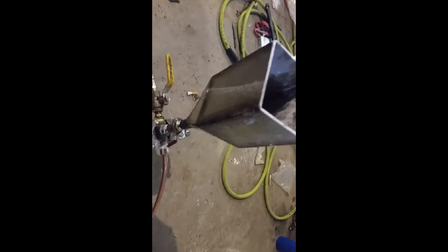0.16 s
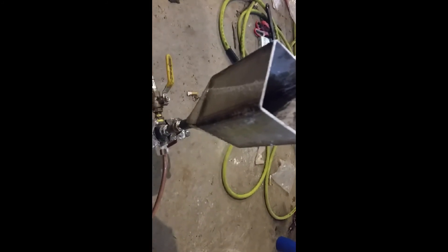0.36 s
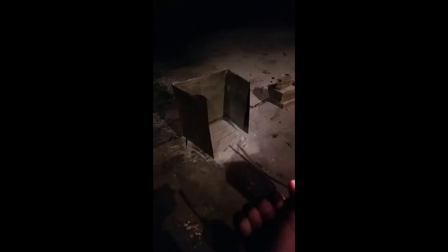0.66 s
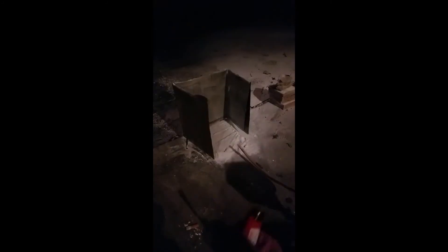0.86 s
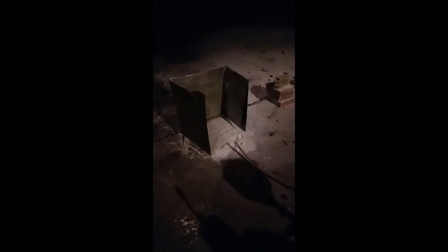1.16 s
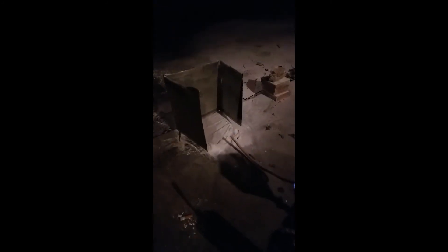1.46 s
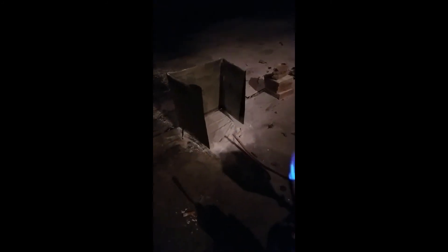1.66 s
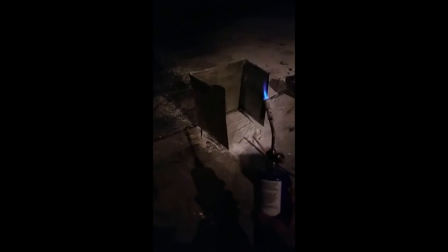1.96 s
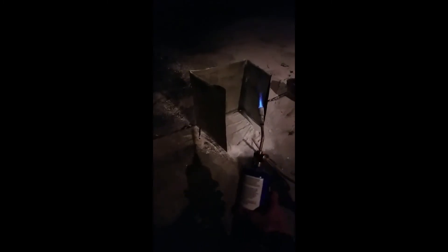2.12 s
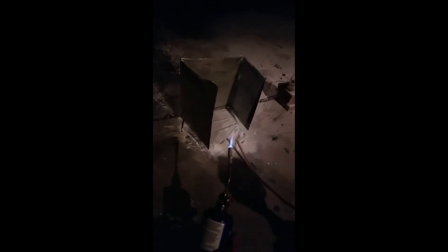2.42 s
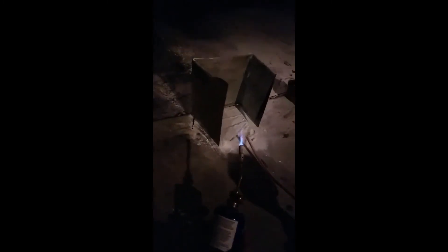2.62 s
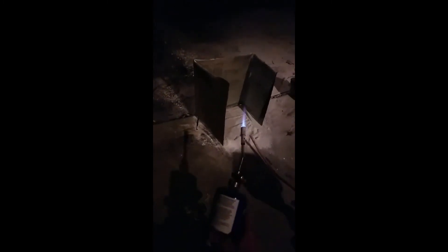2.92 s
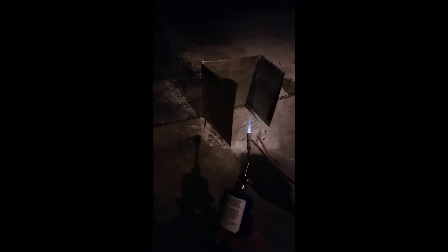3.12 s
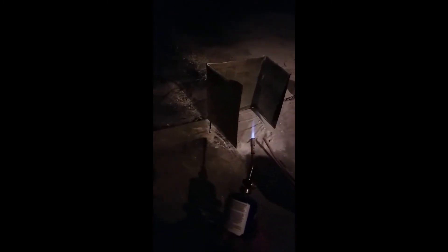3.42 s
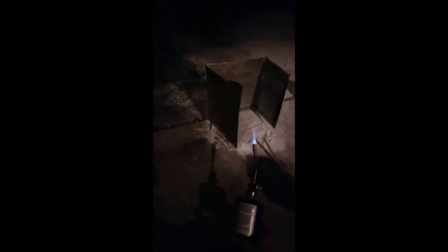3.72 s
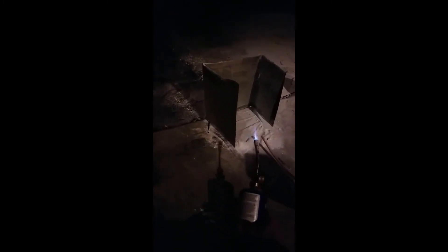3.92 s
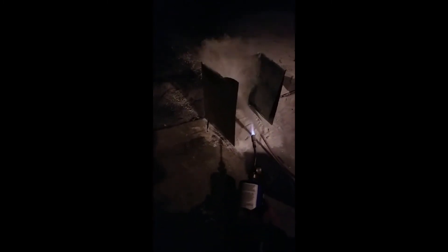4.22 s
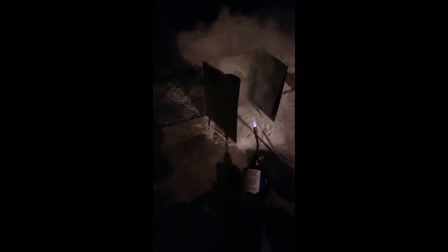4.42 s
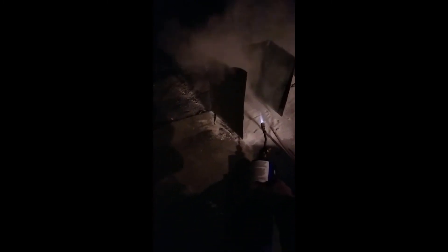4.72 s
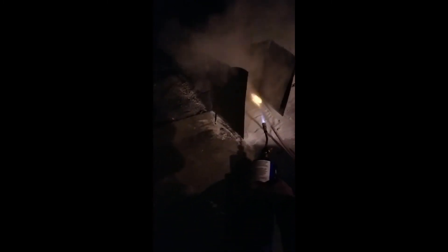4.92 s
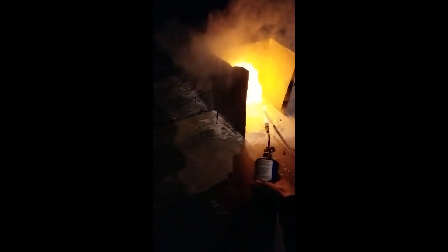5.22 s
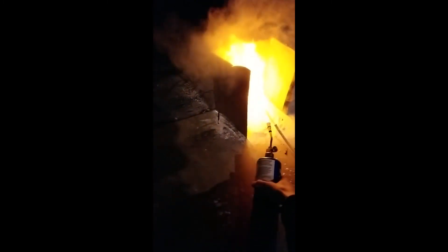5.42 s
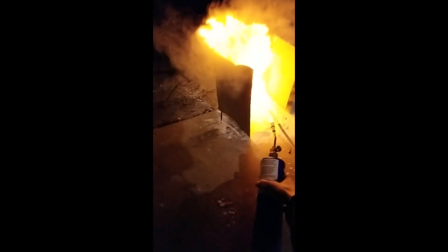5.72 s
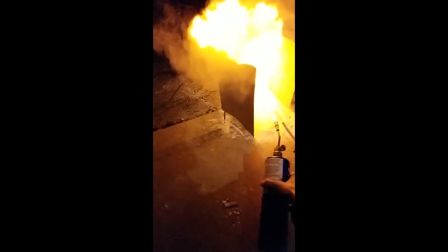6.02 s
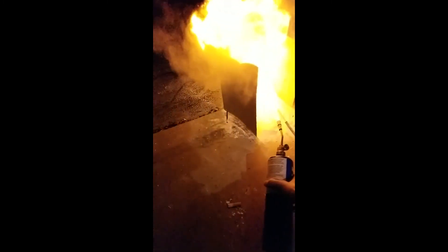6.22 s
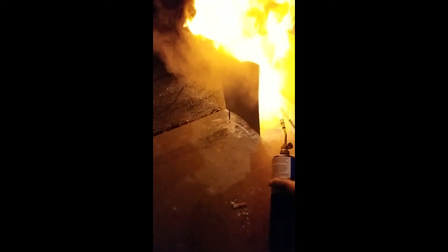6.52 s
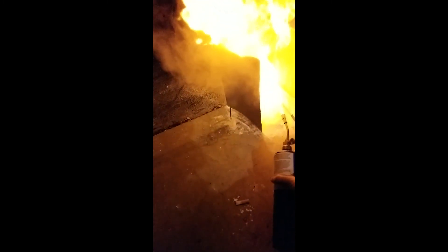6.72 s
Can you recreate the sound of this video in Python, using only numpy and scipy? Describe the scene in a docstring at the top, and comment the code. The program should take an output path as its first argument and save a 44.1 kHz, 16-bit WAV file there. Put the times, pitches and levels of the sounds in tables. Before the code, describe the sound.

A brief plastic knock over faint room hum gives way to an outdoor scene with a bright hiss of compressed air. Close to the microphone, a gas torch lights with a low pop, its fittings click, and it roars with a low flutter. A hollow note climbs through the noise until powder ignites. The sound suddenly turns slowed and muffled, and a fireball billows up in deep surges.

```python
"""Torch and powder fireball

A quiet workshop and a knock on plastic; then, outdoors, compressed air hisses beside a roaring torch.
The ground reflects both jets, and the echo sweeps upward as the torch is lowered to powdered fuel.
The powder catches and the scene drops into slow motion: a dull hiss under a fireball's growing rumble."""
import sys
import numpy as np
from scipy import signal
from scipy.fft import rfft, irfft, next_fast_len
from scipy.io import wavfile
from scipy.ndimage import uniform_filter1d

SR = 44100
rng = np.random.default_rng(int(sys.argv[2]) if len(sys.argv) > 2 else 0)


def waveform_to_disk(signal):
    """Save audio, clipped to [-1, 1], as 16-bit WAV at the path in sys.argv[1]."""
    frames = np.transpose(np.atleast_2d(signal))
    scaled = np.clip(frames, -1, 1) * 32767
    samples = np.round(scaled).astype(np.int16)
    wavfile.write(sys.argv[1], SR, samples)


N = 302746
TIME = np.arange(N) / SR
BINS_HZ = np.fft.rfftfreq(1024, 1 / SR)
FRAMES_S = np.arange(N // 256 + 5) * 256 / SR


def amp(db):
    """Decibels to gain."""
    return 10 ** (np.asarray(db) / 20)


def rms(x):
    """Root mean square."""
    return np.sqrt(np.mean(x ** 2) + 1e-20)


def follow(rows, at=TIME):
    """A curve of (seconds, value) rows at the given times."""
    return np.interp(at, *np.transpose(rows))


def step(middle_s, width_s, at=TIME):
    """Smooth rise from 0 to 1."""
    return .5 + .5 * np.tanh((at - middle_s) / (2 * width_s))


def gate(start_s, end_s, fade_in_s, fade_out_s):
    """Gain 1 from start to end, with smooth edges."""
    return .5 + .5 * np.tanh(np.minimum((TIME - start_s) / fade_in_s, (end_s - TIME) / fade_out_s))


def add(mix, start_s, sound):
    """Adds a mono or stereo sound to a stereo mix."""
    part = mix[:, round(start_s * SR):][:, :sound.shape[-1]]
    part += sound[..., :part.shape[1]]


def lowpass(x, hz, taps=601):
    """Steep low-pass of both channels."""
    kernel = signal.firwin(taps, hz, window=("kaiser", 8), fs=SR)
    return signal.oaconvolve(x, kernel[None], "same")


def spectrum_at(rows, at_hz):
    """Each column of a spectrum, interpolated over log frequency."""
    hz, *columns = np.transpose(rows)
    return [np.interp(np.log(at_hz + 1), np.log(hz), column) for column in columns]


def turbulence(spectrum, patchy_db, colour_db=0, lag_ms=0):
    """Stereo noise, mid rms 1, with eddies that lift patches of its spectrum."""
    left_db, right_db, likeness = spectrum_at(spectrum, BINS_HZ)
    re, im, other_re, other_im, eddies = rng.standard_normal((5, len(FRAMES_S), len(BINS_HZ)))
    eddies = uniform_filter1d(uniform_filter1d(eddies, 12, axis=0), 6, axis=1)
    left = re + 1j * im
    right = likeness * left + np.sqrt(1 - likeness ** 2) * (other_re + 1j * other_im)
    right *= np.exp(-2j * np.pi * BINS_HZ * lag_ms / 1000)
    spectra = np.array([left * amp(left_db), right * amp(right_db)])
    spectra *= amp(patchy_db * eddies / rms(eddies) + colour_db)
    noise = signal.istft(spectra, nperseg=1024, noverlap=768, time_axis=1, freq_axis=2)[1][:, :N]
    return noise / rms(noise.mean(0))


def rumble(spectrum, steady_s):
    """Deep stereo noise, mid rms near 1, its swells evened out over steady_s."""
    size = next_fast_len(N, True)
    hz = np.fft.rfftfreq(size, 1 / SR)
    db, likeness = spectrum_at(spectrum, hz)
    left, other = rfft(rng.standard_normal((2, size)))
    right = likeness * left + np.sqrt(1 - likeness ** 2) * other
    low_hz, high_hz = spectrum[0][0], spectrum[-1][0]
    rolloff = np.minimum(hz / low_hz, 1) ** 2 / (1 + (hz / high_hz) ** 4)
    noise = irfft(np.array([left, right]) * amp(db) * rolloff, size)[:, :N]
    power = uniform_filter1d(noise.mean(0) ** 2, int(steady_s * SR) + 1)
    return noise / np.sqrt(power + 1e-12)


def strikes(blows, modes, crack_gain, crack_t60_s, contact_s=0.0001):
    """Each blow is a crack of noise and the short ring of the struck object."""
    out, t = np.zeros((2, N)), np.arange(SR // 8) / SR
    for start_s, peak_db, lean_db, hardness_db in blows:
        ring = np.zeros((2, len(t)))
        for hz, db, t60_s in modes:
            envelope = amp(db + hardness_db * np.log2(hz / modes[0][0]) - 60 * t / t60_s)
            phase = rng.random() + rng.random((2, 1)) / 4
            ring += envelope * np.sin(2 * np.pi * (hz * t + phase))
        crack = crack_gain * rng.standard_normal((2, len(t))) * amp(-60 * t / crack_t60_s)
        hit = (ring / abs(ring).max() + crack) * (1 - np.exp(-t / contact_s))
        pan = amp(np.array([[.5], [-.5]]) * lean_db)
        add(out, start_s, amp(peak_db) * pan * hit / abs(hit).max())
    return out


# Room and rustle spectra. Each row: frequency in Hz, left and right in relative dB, stereo correlation.
ROOM_SPECTRUM = [(25, -10, -18, 0.72), (88, -1, 2, 0.94), (221, -13, -11.5, 0.9), (450, -22, -21.5, 0.1),
                 (1500, -29, -27.5, 0.049), (4500, -30, -30, -0.0), (9000, -33, -36, 0.077),
                 (14000, -31, -30, -0.1)]
RUSTLE_SPECTRUM = [(300, 4, 6.5, .3), (1200, -8, -8, 0.024), (2400, -3, -3, 0), (4200, -3, 1.5, 0),
                   (7000, -5.5, -11, 0), (14000, -14, -17, 0)]
# Hum. Each row: frequency in Hz, relative level in dB.
HUM_TONES = [(91.5, -67.5), (166.9, -90), (253.0, -74)]


def workshop(room_db=-63.5, hum_trim_db=-2, rustle_db=-61, hold_s=.09, fade_db_per_s=96, rest_db=-85):
    """Low room noise, a faint hum and a rustle that dies away."""
    hum = sum(np.sqrt(2) * amp(db + hum_trim_db) * np.sin(2 * np.pi * (hz * TIME + rng.random()))
              for hz, db in HUM_TONES)
    room = amp(room_db) * turbulence(ROOM_SPECTRUM, patchy_db=1.6)
    fading_db = np.maximum(rustle_db - fade_db_per_s * np.maximum(TIME - hold_s, 0), rest_db)
    return room + hum + amp(fading_db) * turbulence(RUSTLE_SPECTRUM, patchy_db=3.5)


# Each row: start in seconds, level in dB before the soft onset, pitch in Hz, T60 in seconds.
THUMP_EVENTS = [(.067, -27, 104, 0.055), (0.094, -27.5, 308, 0.023), (1.181, -13, 108, 0.039),
                (5.376, -39.5, 1110, 0.073)]


def thumps(rise_cycles=0.8):
    """Damped sines: two thumps in the workshop, one as the flame takes hold, a ping in slow motion."""
    out, t = np.zeros((2, N)), np.arange(SR // 8) / SR
    for start_s, db, hz, t60_s in THUMP_EVENTS:
        onset = 1 - np.exp(-(hz * t / rise_cycles) ** 2)
        add(out, start_s, onset * amp(db - 60 * t / t60_s) * np.sin(2 * np.pi * hz * t))
    return out


# Each row: start in seconds, peak in dB before panning, left minus right in dB, hardness in dB/octave.
PLASTIC_BLOWS = [(.0678, -42, 12, -4.5), (.0924, -18.6, -6, -0.2)]
# Each row: frequency in Hz, relative level in dB, T60 in seconds.
PLASTIC_MODES = [(530, -3.5, 0.0064), (784, -7.5, 0.0087), (1400, -6.5, 0.0052), (2100, -4.5, 0.0033),
                 (3270, -9, .005), (4470, -12, 0.0045), (5640, -2.5, 0.0056), (6540, -13, .005),
                 (8450, -15, 0.0056), (11400, -15, 0.0044), (14200, -14, .004)]


def plastic_knocks():
    """Hard plastic, touched and then knocked, rings for a few milliseconds."""
    return strikes(PLASTIC_BLOWS, PLASTIC_MODES, crack_gain=.06, crack_t60_s=0.0071)


LOWERED_S, LOWERING_S = 2.92, .08
# Ground echo, shorter as the torch is lowered. Each row: time in seconds, delay in ms.
ECHO_DELAY = [(1.7, 2.5), (2.5, 2.4), (2.8, 1.7), (3.1, 1.36), (3.65, 1.45), (4.2, 1.164), (4.85, .88),
              (5.27, 0.65)]


def ground_echo(at, raised=.1, lowered=0.37):
    """Delay in seconds and strength of the reflection, faint until the flame points at the ground."""
    return follow(ECHO_DELAY, at) / 1000, raised + (lowered - raised) * step(LOWERED_S, LOWERING_S, at)


def ground_comb(right_detour=0.895, dull_hz=5600, hollow_db=10, hollow_octaves=0.32):
    """Echo ripple in dB; rough ground scatters the treble, and the right side has the shorter detour."""
    delay_s, strength = ground_echo(FRAMES_S[:, None])
    delay_s = np.array([delay_s, delay_s * right_detour])
    echo = strength / (1 + (BINS_HZ / dull_hz) ** 4) * np.exp(-2j * np.pi * BINS_HZ * delay_s)
    # Repeated bounces sharpen the first peak into a hollow, rising note.
    hollow = np.exp(-(np.log2((BINS_HZ + 1) * delay_s) / hollow_octaves) ** 2)
    return 20 * np.log10(abs(1 + echo)) + hollow_db * strength * hollow


def with_bass_echo(direct, bass_boost=1.6):
    """Adds the ground echo to a deep sound; bass reflects better than treble."""
    delay_s, strength = ground_echo(TIME)
    echo = np.array([np.interp(TIME - delay_s, TIME, side) for side in direct])
    gain = bass_boost * strength
    return (direct + gain * echo) / (1 + gain)


# Each row: frequency in Hz, left and right in relative dB, stereo correlation.
AIR_SPECTRUM = [(800, -39.5, -39.5, .5), (1500, -18, -20.5, 0.32), (2600, -16, -17.5, 0.2),
                (3990, -7, -10.5, 0.17), (4760, -6, -8, .2), (6200, -3.5, -5, 0.18), (7900, -4, -7, 0.1),
                (8900, -7.5, -10.5, 0.295), (9680, -2.5, -11.5, 0.27), (10550, 2.5, -5, 0.25),
                (11400, 0, -5.5, 0.28), (12600, -3, -5.5, 0.23), (13800, 1.5, -2, .3),
                (14580, -1.5, -9.5, .3)]
# Shading of the right side as the microphone turns. Each row: time in seconds, relative shade in dB.
AIR_RIGHT_SHADE = [(1.4, 1.5), (2.4, 2), (2.88, 8.5), (3.07, 4.5), (4.35, 4), (5.25, 10)]
# Each row: time in seconds, lag of the right side in ms.
AIR_RIGHT_LAG = [(.8, 0.084), (2.4, 0.083), (3.1, 0.17), (5.2, .16)]


def air_jet(comb_db, open_db=-36, open_s=1.436, opening_db_per_s=16, sizzle_hz=11000):
    """Air hisses from the feed line as its valve opens, sizzling more once the microphone points down."""
    valve_db = open_db - opening_db_per_s * np.maximum(open_s - TIME, 0)
    dip_db = -np.exp(-((TIME - 2.36) / 0.2) ** 2)
    shade_db = np.array([[0.097], [-0.903]]) * (follow(AIR_RIGHT_SHADE) - 5)
    sizzle_band = np.exp(-((BINS_HZ - sizzle_hz) / 1300) ** 2)
    sizzle_db = (-1.7 + 2 * step(LOWERED_S, LOWERING_S, FRAMES_S[:, None])) * sizzle_band
    lag_ms = follow(AIR_RIGHT_LAG, FRAMES_S[:, None])
    hiss = turbulence(AIR_SPECTRUM, patchy_db=1.5, colour_db=comb_db + sizzle_db, lag_ms=lag_ms)
    return amp(valve_db + dip_db + shade_db) * hiss


LIT_S = 1.178
# Each row: end of rise and start of fall in seconds, flutter and roar levels in dB.
GAS_FLARES = [(.89, 0.998, -40.5, -45), (1.117, 1.16, -37.5, -43), (1.189, 1.185, -35, -37.5)]


def ignition(near_db, lit_roar_db=-39, lit_flutter_db=-46.5, rise_db_per_s=325, fall_db_per_s=400):
    """Roar and flutter gains: gas flares softly twice, then pops as the flame settles on the nozzle."""
    lit = step(LIT_S, width_s=0.002)
    roar, flutter = lit * amp(lit_roar_db + near_db), lit * amp(lit_flutter_db)
    for risen_s, fall_s, flutter_db, roar_db in GAS_FLARES:
        rise_db = -rise_db_per_s * np.maximum(risen_s - TIME, 0)
        fall_db = -fall_db_per_s * np.maximum(TIME - fall_s, 0)
        roar = np.hypot(roar, amp(roar_db + rise_db + fall_db))
        flutter = np.hypot(flutter, amp(flutter_db + rise_db + fall_db))
    return roar, flutter


# Torch held close, then lowered. Each row: time in seconds, gain from nearness in dB.
TORCH_NEARNESS = [(1.2, 3.5), (1.4, 4), (2.25, 3), (2.6, -1), (2.9, -2), (3.05, 1.5), (3.7, 0), (4.25, 1),
                  (4.55, -.5), (5.25, -0.6)]
# Each row: frequency in Hz, relative level in dB, stereo correlation.
FLUTTER_SPECTRUM = [(20, -16.5, .8), (40.16, -13.5, .85), (69.4, -3.5, .9), (116, 1, 0.91),
                    (161, -4.5, 0.82), (225, 0, .8), (420, -9, 0.73), (1000, -35.5, .8)]
# Each row: frequency in Hz, left and right in relative dB, stereo correlation.
ROAR_SPECTRUM = [(80.7, -19, -23, 1), (237.2, -3, -1, 0.36), (420, 0.5, -2.5, .7), (670, 0, -3.5, 0.64),
                 (923, 0.5, -1, 0.69), (1210, 0.5, -1.5, 0.49), (1828, -3.5, -7.5, 0.29),
                 (2480, -4.5, -8, 0.33), (3777, -10.5, -12, .1), (6400, -20, -25.5, .2)]


def torch(comb_db, flicker_db=0.5, idle_db=-66):
    """The flame roars, brighter when near; each low flutter shakes the roar a little."""
    roar_gain, flutter_gain = ignition(follow(TORCH_NEARNESS))
    near_db = follow(TORCH_NEARNESS, FRAMES_S)
    tilt_db_per_octave = np.where(FRAMES_S < LIT_S, 0.4, 0.76 + 0.19 * near_db)
    octaves = np.log2(np.clip(BINS_HZ, 250, 4000) / 1000)
    colour_db = comb_db + tilt_db_per_octave[:, None] * octaves
    # Echo and tilt colour the roar but keep its midrange power.
    midrange = (BINS_HZ > 450) & (BINS_HZ < 1800)
    power = np.mean(amp(colour_db[:, :, midrange]) ** 2, axis=(0, 2))
    colour_db -= 10 * np.log10(power)[:, None]
    flutter = with_bass_echo(rumble(FLUTTER_SPECTRUM, steady_s=0.13))
    roar = turbulence(ROAR_SPECTRUM, patchy_db=1.71, colour_db=colour_db)
    flicker = amp(flicker_db * flutter.mean(0))
    return roar_gain * flicker * roar + np.hypot(flutter_gain, amp(idle_db)) * flutter


# Each row: start in seconds, peak in dB before panning, left minus right in dB, hardness in dB/octave.
FITTING_BLOWS = [(1.4458, -7, 9, 0.5), (1.4566, -22.5, 3.5, 1.5)]
# Each row: frequency in Hz, relative level in dB, T60 in seconds.
FITTING_MODES = [(2250, -10.5, .014), (2680, -10.5, .014), (3450, -10, 0.0086), (4880, -7.5, 0.0092),
                 (6370, -3, 0.0061), (6950, -5.5, 0.00607), (8240, -9.5, 0.0069), (9700, -15, 0.0074),
                 (11750, -10.5, .006), (13400, -12.5, 0.0082)]


def torch_clicks():
    """A sharp click rings the torch's metal fittings; a weaker echo of it follows 11 ms later."""
    return strikes(FITTING_BLOWS, FITTING_MODES, crack_gain=.1, crack_t60_s=0.01)


# Each row: frequency in Hz, relative level in dB, stereo correlation.
WHOOSH_SPECTRUM = [(90, -13, .9), (199.3, -3.5, .85), (350, 3, .8), (480, -9.5, .8)]


def powder_whoosh(full_db=-45.5, full_s=5.18, swell_db_per_s=16.5):
    """A low whoosh swells as the flame spreads into the powder."""
    level_db = full_db - swell_db_per_s * np.maximum(full_s - TIME, 0)
    return amp(level_db) * rumble(WHOOSH_SPECTRUM, steady_s=.12)


# Each row: frequency in Hz, left and right in relative dB, stereo correlation.
SLOW_JET_SPECTRUM = [(60, -3, -1.5, 0.84), (110, -9, -9, -0.5), (171, 3.5, -2.5, 0.7), (248, 0, -7.5, 0.91),
                     (308, -6, -12.5, -0.16), (520, -7.5, -11.5, -0.3), (820, -3.5, -12.5, -0.3),
                     (1160, -9.5, -18, 0.94), (1340, 3.5, -10.5, 0.25), (1550, -5.5, -13, -0.41),
                     (1860, -2, -11.5, 0.056), (2400, -9, -21, 0.27)]
# Each row: frequency in Hz, relative level in dB, stereo correlation.
BILLOW_SPECTRUM = [(18, -0.5, 0.97), (30, -3.5, 0.89), (48.3, 2.5, 0.85), (75, -18, 0.35),
                   (120.4, -26, 0.21), (249, -22.5, 0), (600, -31.5, 0), (2400, -40.5, 0)]
# Each row: centre in seconds, boost in dB.
BILLOW_SURGES = [(6.33, 6), (6.6, 5), (6.765, 2.5)]


def fireball(jets_db=-45.5, jets_growth_db=3, smoulder_db=-55.5, fire_growth_db=18, surge_width_s=.04):
    """In slow motion the jets sink by octaves, and the burning cloud smoulders, then billows up."""
    growth = step(middle_s=6.445, width_s=0.083)
    surge_db = sum(db * np.exp(-((TIME - s) / surge_width_s) ** 2) for s, db in BILLOW_SURGES)
    jets = amp(jets_db + jets_growth_db * growth) * turbulence(SLOW_JET_SPECTRUM, patchy_db=1.3)
    fire_db = smoulder_db + fire_growth_db * growth + surge_db
    billows = amp(fire_db) * rumble(BILLOW_SPECTRUM, steady_s=0.13)
    return lowpass(jets + billows, hz=2510, taps=2401)


def scene():
    """Three scenes in turn: workshop, jets in the yard, fireball in slow motion."""
    comb_db = ground_comb()
    yard = air_jet(comb_db) + torch(comb_db) + powder_whoosh()
    hits = thumps() + plastic_knocks() + torch_clicks()
    return (workshop() * gate(-.1, 0.681, fade_in_s=.005, fade_out_s=0.011)
            + yard * gate(0.7523, 5.274, fade_in_s=0.0042, fade_out_s=0.016)
            + fireball() * gate(5.274, 6.856, fade_in_s=.004, fade_out_s=0.013) + hits)


def record(dry):
    """Cuts the highest treble."""
    return lowpass(dry, hz=14680)


dry = scene()
out = record(dry)
waveform_to_disk(out)
```